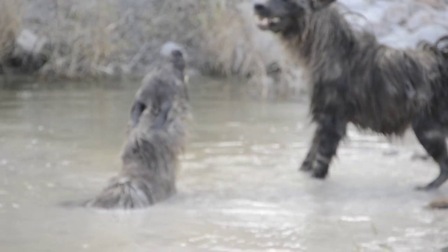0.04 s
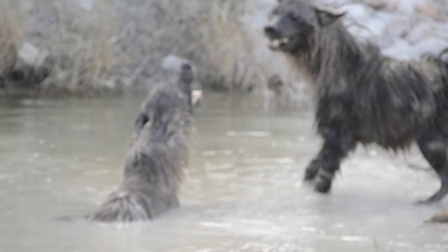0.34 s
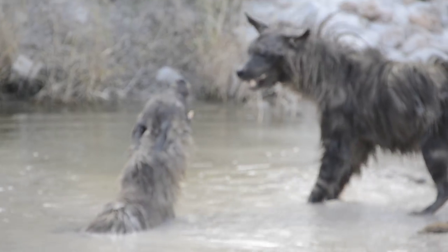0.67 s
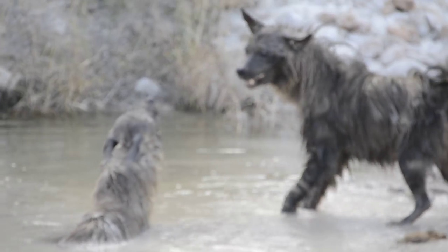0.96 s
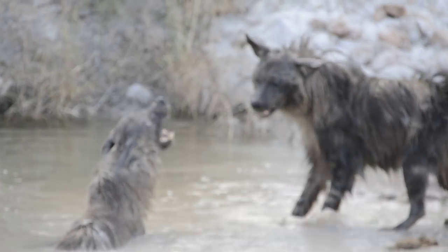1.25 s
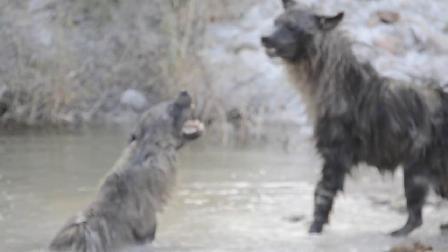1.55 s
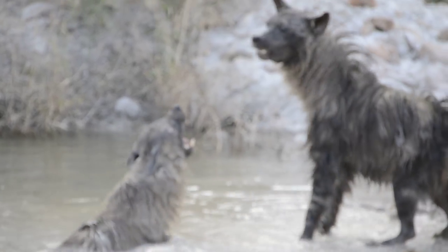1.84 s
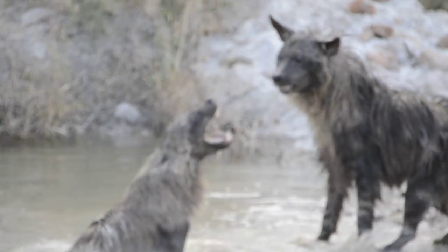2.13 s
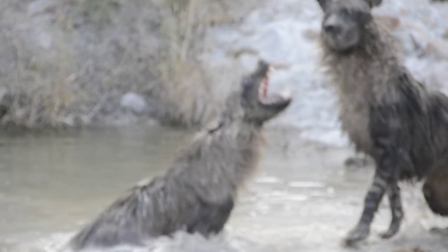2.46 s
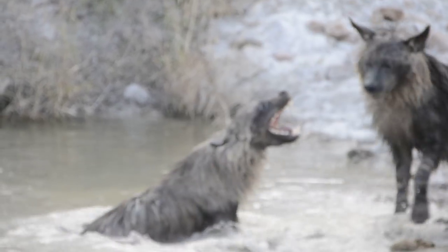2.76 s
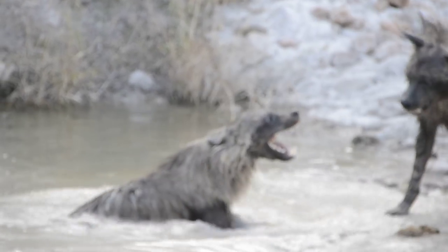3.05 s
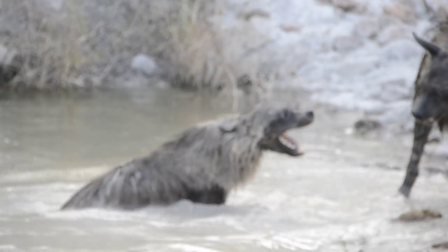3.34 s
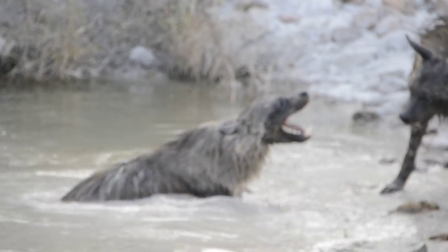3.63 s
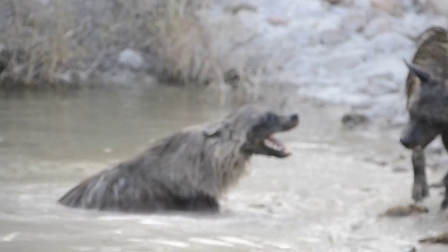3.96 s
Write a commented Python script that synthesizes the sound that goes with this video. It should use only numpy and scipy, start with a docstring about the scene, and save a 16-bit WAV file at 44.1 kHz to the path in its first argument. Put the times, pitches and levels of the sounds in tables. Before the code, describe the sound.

A hyena's rattling growls break into hoarse yells, with a hiss and light splashes.

```python
"""Hyenas squabbling in a waterhole

One of two hyenas rattles out a growl, slow slaps of the vocal folds that speed up and break into an
arched yell, five times. Each yell is a harmonic source filtered by the throat, hoarse at both ends.
After the loudest it hisses with open jaws while the water splashes. The banks echo, and small birds
whistle far off in the open air."""
import sys
import numpy as np
from scipy import signal
from scipy.fft import rfft, irfft, next_fast_len
from scipy.io import wavfile
from scipy.ndimage import map_coordinates

SR = 44100
rng = np.random.default_rng(int(sys.argv[2]) if len(sys.argv) > 2 else 0)


def generate_wav(signal):
    """Clip the signal to [-1, 1] and save it as 16-bit WAV at the path in sys.argv[1]."""
    frames = np.transpose(np.atleast_2d(signal))
    scaled = np.clip(frames, -1, 1) * 32767
    pcm = np.round(scaled).astype(np.int16)
    wavfile.write(sys.argv[1], SR, pcm)


N = 176400
T = np.arange(N) / SR
TOP_HZ = 11200  # band limit
BREAK_S, GRAIN_DB = 0.032, 2.5  # time the voice takes to break; level scatter of rushing breath


def amp(db):
    """Amplitude ratio of a level in decibels."""
    return 10 ** (np.asarray(db) / 20)


def along(points, hz):
    """Interpolation of (frequency [Hz], value) points on a logarithmic frequency axis."""
    f, v = np.transpose(points)
    return np.interp(np.log(hz + 1), np.log(f + 1), v)


def wobble(rate, t=T):
    """Smooth random modulation: a spline through `rate` Gaussian knots a second."""
    return map_coordinates(rng.standard_normal(int(N * rate / SR) + 4), [t * rate])


def coloured(x, *spectra):
    """Minimum-phase filtering at unit energy; the spectra are in cascade, so their decibels add."""
    m = 2 * next_fast_len(N)
    hz = np.fft.rfftfreq(m, 1 / SR)
    cepstrum = irfft(np.log(amp(sum(along(s, hz) for s in spectra))))
    response = np.exp(rfft(np.r_[cepstrum[0], 2 * cepstrum[1:m // 2]], m))
    return irfft(rfft(x, m) * response / np.sqrt(np.mean(abs(response) ** 2)))[:N]


def noise(*spectra):
    """Filtered white noise with an rms near 1."""
    return coloured(rng.standard_normal(N), *spectra)


def open_air():
    """Ambient noise: a faint continuous spectrum whose level drifts slowly."""
    # spectrum of the open air (frequency [Hz], relative level [dB])
    spectrum = [(15, -52), (25, -28), (603, -10.5), (862, -4.5), (1260, -6), (1470, -8), (1900, -11.5),
                (3770, -19.5), (11000, -36), (14300, -71), (22000, -120)]
    return amp(-57 + wobble(4.28)) * noise(spectrum)


def growls():
    """Pulse excitation: each rattle is four fold slaps and a puff, brighter and airier with effort."""
    # one curve a growl (time [s], rattle rate [1/s], relative level [dB])
    curves = [
        [(.005,47,-32),(.052,48,-30)],
        [(.251,30.3,-38),(.42,29.3,-38),(.605,31.2,-41),(.655,43.7,-31),(.735,62.3,-25)],
        [(.982,32,-37),(1.132,34.7,-41),(1.293,39.8,-35),(1.406,48.7,-28),(1.47,68,-19),(1.515,80,-19)],
        [(1.791,42.4,-31),(1.909,42.4,-32),(2.065,46.5,-27),(2.14,60.3,-19),(2.195,93.6,-17),(2.225,94,-19)],
        [(3.253,24,-52),(3.376,24.4,-39),(3.495,25.9,-37),(3.557,37.7,-33),(3.622,59.1,-21)],
        [(3.948,30,-37),(3.997,30,-42)],
    ]
    # throat response in a soft growl (frequency [Hz], relative gain [dB])
    soft_throat = [(60,-47.5),(170,-19.5),(260,-5),(450,-13),(620,-13),(780,-1),(880,-8),(1000,3),(1220,-7),(1500,-3),(2200,-11),(2700,-25),(5000,-33),(11000,-54)]
    # throat response in a hard growl (frequency [Hz], relative gain [dB])
    hard_throat = [(60,-41),(170,-52),(290,-15),(550,-17),(800,-3),(1050,3.5),(1350,-8),(1750,1.5),(2300,-2),(3000,-13.5),(4200,-31),(5600,-26),(8000,-40),(11000,-48)]
    fold_hz, fold_scatter, fold_loss_db = 255, .1, 9
    puff_db, puff_effort_db, puff_decay_s = -2, 6, .007
    soft_db, hard_db, gain_db = -40.5, -20, -2  # curve levels of no and of full effort; overall gain
    soft, hard = np.zeros((2, N + SR))
    t, slaps = T[:SR // 25], np.arange(4)
    slap_db = -fold_loss_db * slaps * (slaps - 1) / 2  # the last two slaps are weaker
    for curve in curves:
        times, rate, level_db = np.transpose(curve)
        span = T[(T >= times[0]) & (T <= times[-1])]
        cycles = np.cumsum(np.interp(span, times, rate)) / SR
        for start in np.interp(np.arange(cycles[-1]), cycles, span):
            db = np.interp(start, times, level_db) + rng.normal(0, 1)
            effort = np.clip((db - soft_db) / (hard_db - soft_db), 0, 1)
            puff = rng.standard_normal(len(t)) * np.exp(-t / puff_decay_s)
            rattle = amp(puff_db + puff_effort_db * effort) * puff / np.linalg.norm(puff)
            delays = slaps / fold_hz * (1 + fold_scatter * rng.uniform(-1, 1, len(slaps)))
            rattle[(delays * SR).astype(int)] -= amp(slap_db + rng.normal(0, 1.15, len(slaps)))
            rattle *= amp(db + gain_db) * np.sqrt(2 * SR / fold_hz) / np.linalg.norm(rattle)
            soft[int(start * SR):][:len(t)] += (1 - effort) * rattle
            hard[int(start * SR):][:len(t)] += effort * rattle
    return coloured(soft[:N], soft_throat) + coloured(hard[:N], hard_throat)


def yell(timing, arch, voice):
    """Source and filter: harmonics arch through the throat; jitter, shimmer and rasp make them hoarse."""
    # response of throat and mouth (frequency [Hz], relative gain [dB])
    tract = [(200,-14.5),(370,-20),(500,-20.5),(620,-19.5),(780,-6.5),(1040,-0.5),(1140,-8),(1220,3.5),(1430,-4),(1740,0),(2030,-9),(2200,-5.5),(2550,-22),(3150,-22.5),(3900,-32),(5700,-27.5),(7200,-35.5),(8000,-45.5),(8700,-39),(11000,-55)]
    # tilt of the rasp against the voice (frequency [Hz], relative gain [dB])
    rasp_tilt = [(100,-20),(500,-10),(1500,-1),(4000,6),(10000,6)]
    # air leaking past the folds (frequency [Hz], relative level [dB])
    breath_spectrum = [(300,-50),(1500,-12),(2600,0),(3800,-2),(5400,0),(7200,-5),(8000,-18),(11000,-24)]
    start_s, full_s, clears_s, release_s, level_db, release_db_per_s = timing
    top_s, top_hz, rise_s, fall_s, sharpness, sag = arch
    clear_rough, mouth_hz, bright_db = voice
    attack_db_per_s, fade_s, mouth_db, mouth_octaves = 220, .008, 3, 0.34
    hoarse = 0.729  # roughness at both ends
    jitter, shimmer_db, rasp_gain, flutter_depth = 0.0583, 3.5, 0.47, 0.22  # each scaled by roughness

    before, after = np.maximum(top_s - T, 0), np.maximum(T - top_s, 0)
    drop_octaves = (before / rise_s) ** 2.4 + (after / fall_s) ** sharpness + sag * after
    released_db = release_db_per_s * np.maximum(T - release_s, 0)
    on = (T > start_s) & (drop_octaves < 1.15) & (released_db < 19)  # too low or too faint: no voice
    t, pitch = T[on], top_hz * 2 ** -drop_octaves[on]
    envelope = amp(level_db - attack_db_per_s * np.maximum(full_s - t, 0) - released_db[on])
    envelope *= np.minimum((t[-1] - t) / fade_s, 1)
    broken = np.clip(np.maximum(clears_s - t, t - release_s) / BREAK_S, 0, 1)
    rough = clear_rough + (hoarse - clear_rough) * broken

    hz = np.geomspace(100, TOP_HZ, 400)
    octaves = np.log2(hz / mouth_hz)
    formant_db = mouth_db * np.exp(-(octaves / mouth_octaves) ** 2)
    throat = np.c_[hz, along(tract, hz) + bright_db * octaves + formant_db]
    throat_phase = np.unwrap(np.angle(rfft(coloured(T == 0, throat))))

    phase = 2 * np.pi * np.cumsum(pitch * (1 + jitter * rough * wobble(500, t))) / SR
    k = np.arange(1, int(TOP_HZ / pitch.min()))[:, None]  # harmonic numbers
    waver_db = np.array([1.5 * np.log2(n) * wobble(35, t) for n in k[:, 0]])
    gains = amp(along(throat, k * pitch) + waver_db) * (k * pitch < TOP_HZ)
    lags = np.interp(k * pitch, np.fft.rfftfreq(N, 1 / SR), throat_phase)
    tone = (gains * np.cos(k * phase + lags)).sum(0) / np.sqrt((gains ** 2).sum(0) / 2)
    flutter = 1 + flutter_depth * rough * np.cos(phase / 3)  # at a third of the pitch
    tone = tone * flutter * amp(shimmer_db * rough * wobble(400, t))
    rasp = noise(throat, rasp_tilt)[on] * (1 + np.cos(phase - 1))  # pulses once a period
    breath = amp(-30 + 2 * bright_db) * noise(breath_spectrum)[on]
    out = np.zeros(N)
    out[on] = envelope * (tone + rasp_gain * rough * rasp + breath) / np.sqrt(1 + rough ** 2)
    low_cut = signal.butter(4, .55 * top_hz, "high", fs=SR, output="sos")
    return signal.sosfilt(low_cut, out)


def yells():
    """Phonation: five calls of the vibrating folds, each with its own pitch arch and mouth resonance."""
    # one yell a row, in three groups:
    # timing (start [s], full level [s], voice clears [s], release [s], level [dB], decay [dB/s])
    # arch (top [s], top pitch [Hz], octave rise [s], octave fall [s], fall exponent, added sag [oct/s])
    # voice (roughness while clear [0-1], mouth resonance [Hz], spectral tilt [dB/oct])
    calls = [((.048,.07,0.092,.125,-31.5,75), (.105,238,.18,.13,2,0), (.5,240,-2.4)),
             ((.722,.785,.775,.83,-18.5,130), (.803,405,.12,.099,2.2,0), (.09,900,-1.9)),
             ((1.498,1.53,1.55,1.73,-11.5,170), (1.6,600,.13,.172,3.6,0), (.22,2450,0)),
             ((2.193,2.215,2.243,2.412,-11.5,480), (2.25,595,.083,.222,11,1.8), (0.079,1580,-.3)),
             ((3.619,3.645,3.65,3.775,-18.5,170), (3.701,472,.101,.128,2.1,0), (.05,2000,-.9))]
    return sum(yell(*call) for call in calls)


def huffs():
    """Turbulent flow: the voice breaks off and grainy air keeps rushing through the throat."""
    # hoarse air that ends a yell (time [s], level [dB], decay time [s])
    breaths = [(.18,-36,.04),(.86,-27,.07),(1.76,-23.5,.075),(3.795,-32,.03)]
    # spectrum of that air (frequency [Hz], relative level [dB])
    spectrum = [(100,-45),(300,-22),(600,-19),(1050,-4),(1600,0),(2100,-7),(3000,-19),(4000,-29),(5600,-28),(7200,-35),(11000,-52)]
    flow = np.zeros(N)
    for peak_s, db, decay_s in breaths:
        rise = np.clip((T - peak_s) / BREAK_S + 1, 0, 1)
        flow += amp(db) * rise * np.exp(-np.maximum(T - peak_s, 0) / decay_s)
    return flow * amp(GRAIN_DB * wobble(220)) * noise(spectrum)


def hiss():
    """Noise excitation: a grainy, voiceless rasp through open jaws."""
    # envelope of the hiss (time [s], relative level [dB])
    envelope = [(2.45,-52),(2.92,-55),(3.095,-53),(3.125,-67)]
    # breath through open jaws (frequency [Hz], relative level [dB])
    spectrum = [(59,-54),(100,-24),(200,-18),(330,-1),(520,-18),(740,-6),(900,-11),(1060,-4),(1300,-13),(1750,-9),
                (3800,-26),(5400,-19),(7200,-25),(8000,-35),(9200,-26),(11000,-42),(14300,-62)]
    times, db = np.transpose(envelope)
    level_db = np.interp(T, times, db, left=-120, right=-120) + 8.5
    return noise(spectrum) * amp(level_db + GRAIN_DB * wobble(220))


def water():
    """Noise transients as the animals shift: splashes decay exponentially, deep gulps swell and fade."""
    # splashes (time [s], relative level [dB])
    splashes = [(2.5194, -35), (2.675, -26), (2.7174, -38), (3.0213, -49)]
    # spectrum of the spray (frequency [Hz], relative level [dB])
    spray_spectrum = [(100,-30),(400,-8),(2000,1),(5000,3),(10500,-12)]
    # deep gulps of water (time [s], level [dB])
    sloshes = [(2.63,-77),(3.32,-68),(3.72,-61)]
    # spectrum of a gulp (frequency [Hz], relative level [dB])
    gulp_spectrum = [(30,-24),(85,-2),(130,-7),(300,-51),(1000,-87)]
    decay_s, half_width_s = .008, .035
    spray = sum(amp(db - 10) * (T >= s) * np.exp(-abs(T - s) / decay_s) for s, db in splashes)
    gulps = sum(amp(db) * np.exp(-((T - s) / half_width_s) ** 2) for s, db in sloshes)
    return spray * noise(spray_spectrum) + gulps * noise(gulp_spectrum)


def birds():
    """Frequency modulation: thin whistles glide with a fast random warble."""
    # distant calls (start [s], duration [s], first pitch [Hz], last pitch [Hz], peak level [dB])
    whistles = [(3.2,0.11,3800,3600,-60.5),(3.277,0.05,3750,3670,-69),(3.283,0.026,5400,5920,-57),(3.87,.05,4400,2920,-42)]
    warble = .06
    out = np.zeros(N)
    for start_s, length_s, from_hz, to_hz, db in whistles:
        progress = np.clip((T - start_s) / length_s, 0, 1)
        hz = (from_hz + (to_hz - from_hz) * progress) * (1 + warble * wobble(500))
        envelope = amp(db) * np.sqrt(abs(np.sin(np.pi * progress)))
        out += envelope * np.sin(2 * np.pi * np.cumsum(hz) / SR)
    return out


def banks(x):
    """Reflection and scattering: a smeared echo off the far bank, a diffuse tail from scrub and rocks."""
    # reverberation of scrub and rocks (frequency [Hz], time to fall 60 dB [s])
    t60 = [(200,0.64),(1500,0.77),(4000,1),(10000,0.4)]
    echo_s, spread_s, echo_db = 0.12, 0.028, -21
    tail_rise_s, tail_db = 0.0053, -14.5
    hz, frame_s, bands = signal.stft(rng.standard_normal(SR), SR, nperseg=256)
    decay = amp(-60 * frame_s / along(t60, hz)[:, None])
    t = T[:SR]
    tail = signal.istft(bands * decay, SR, nperseg=256)[1][:SR] * (1 - np.exp(-t / tail_rise_s))
    echo = rng.standard_normal(SR) * (t > echo_s) * np.exp(-abs(t - echo_s) / spread_s)
    response = amp(tail_db) * tail / np.linalg.norm(tail) + amp(echo_db) * echo / np.linalg.norm(echo)
    return signal.fftconvolve(x, response)[:N]


def scene():
    """Superposition of the direct sound, its reflections and the open air, in one channel."""
    direct = yells() + huffs() + growls() + hiss() + water() + birds()
    return (direct + banks(direct) + open_air())[None]


def record(dry):
    """Hard clipping near full scale, then an ideal low-pass filter at the band limit."""
    m = next_fast_len(N + SR // 2)
    passband = np.fft.rfftfreq(m, 1 / SR) < TOP_HZ
    return irfft(rfft(np.clip(dry, -.9, .9), m) * passband, m)[:, :N]


dry = scene()
out = record(dry)
generate_wav(out)
```